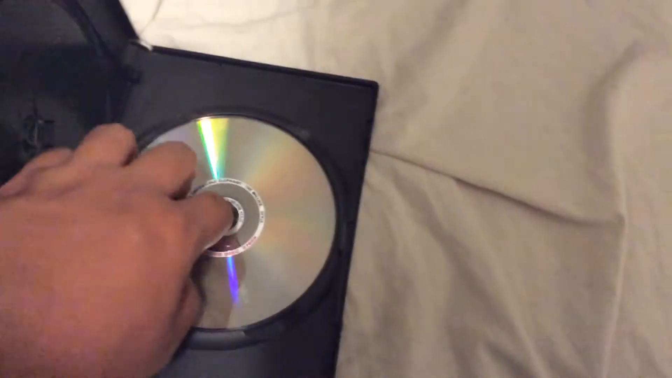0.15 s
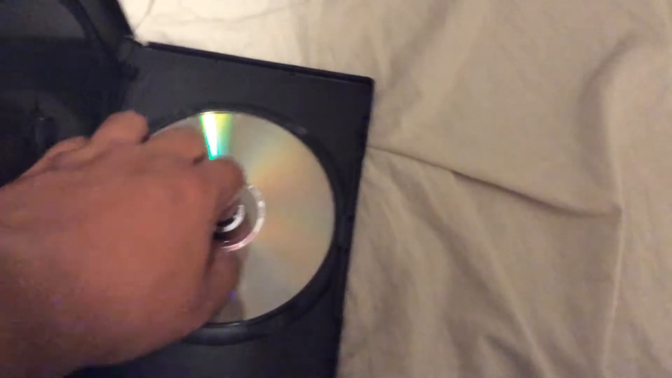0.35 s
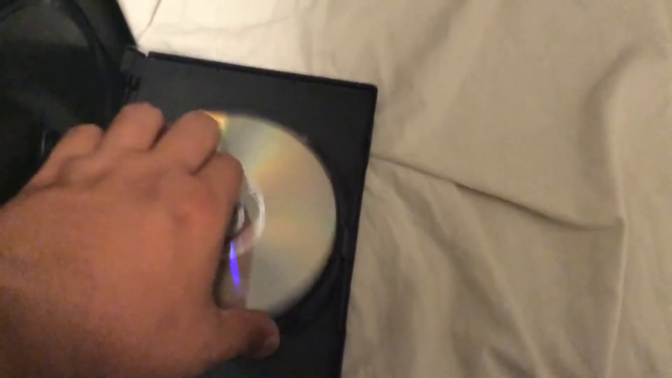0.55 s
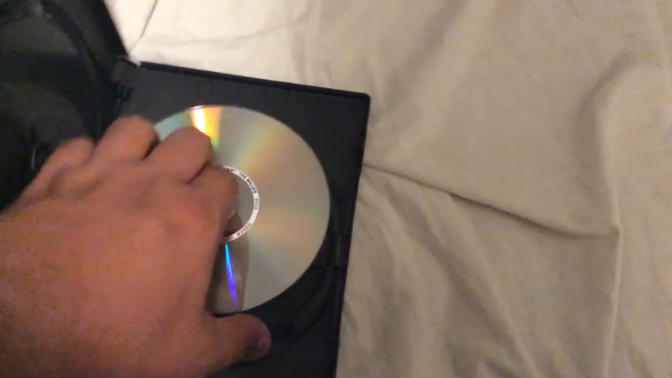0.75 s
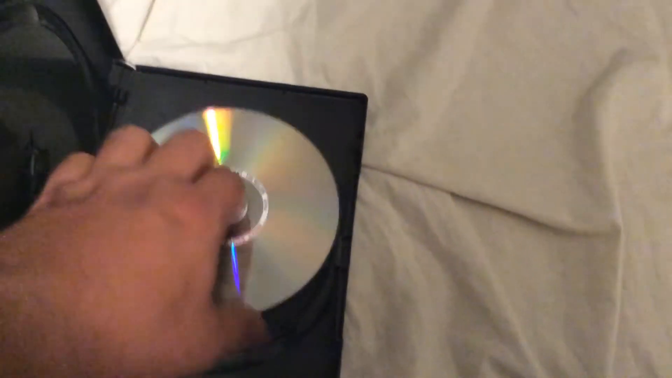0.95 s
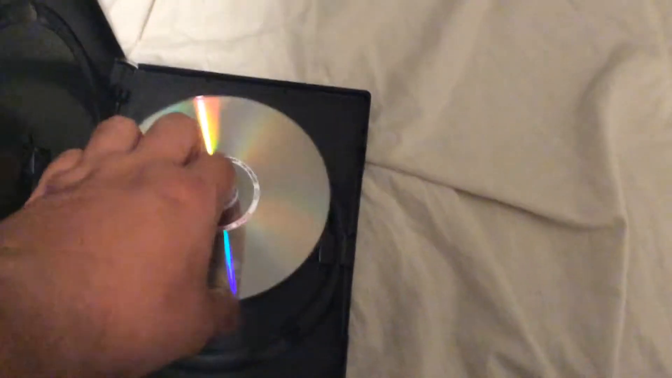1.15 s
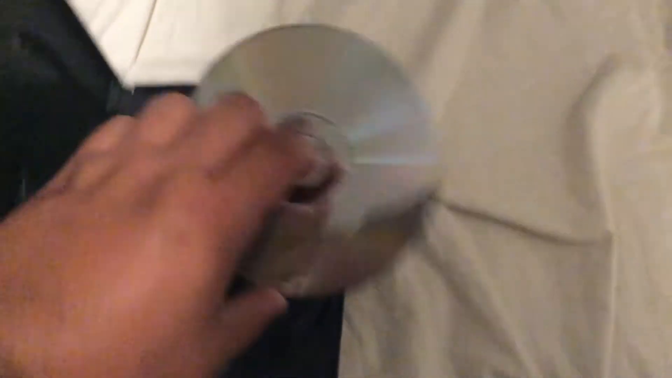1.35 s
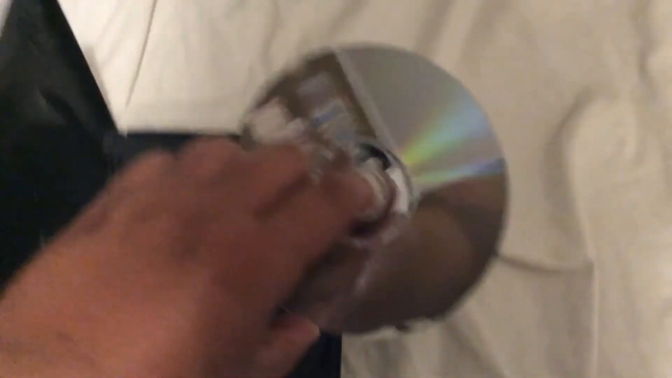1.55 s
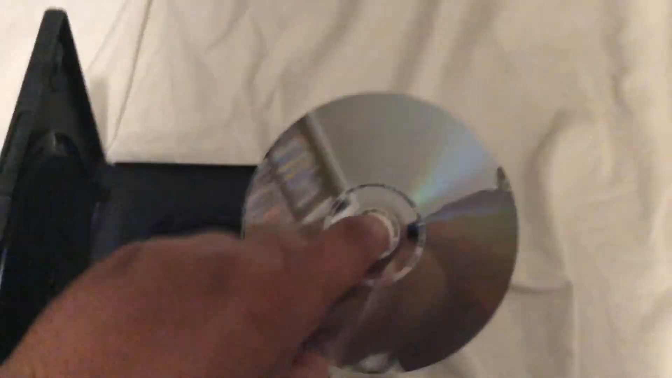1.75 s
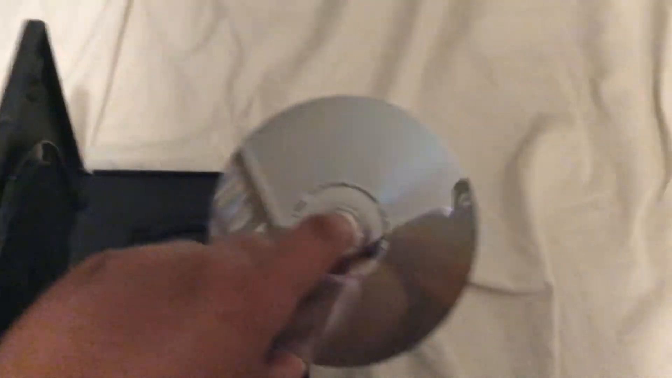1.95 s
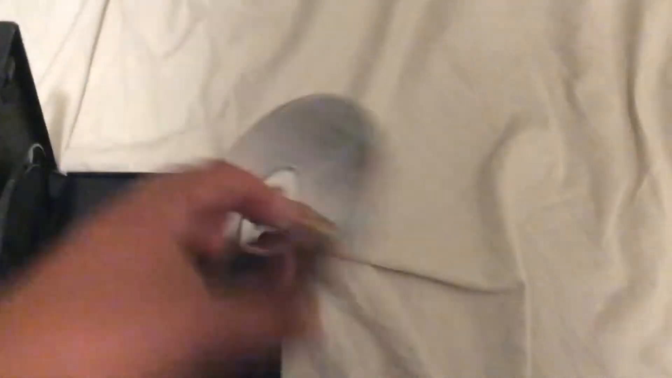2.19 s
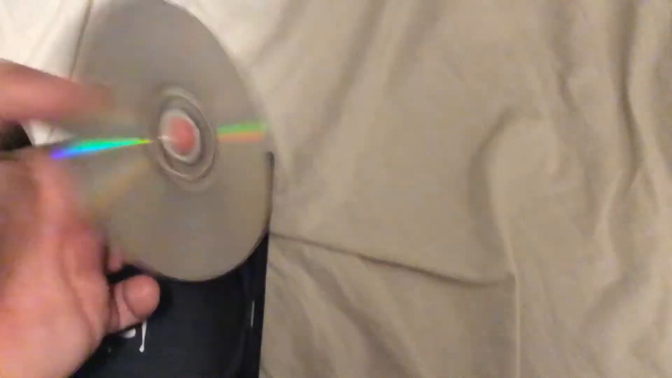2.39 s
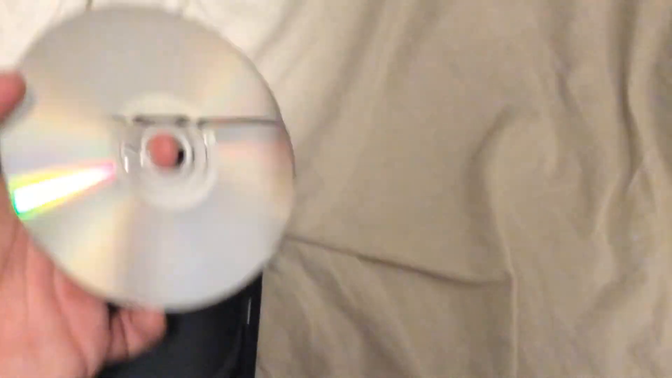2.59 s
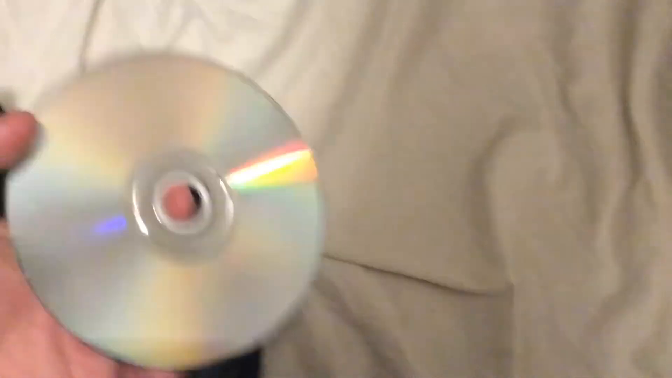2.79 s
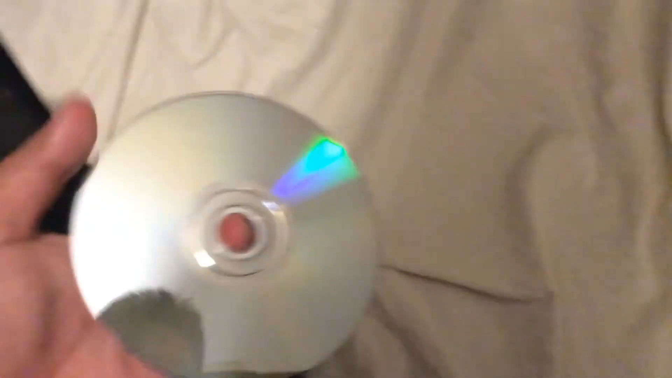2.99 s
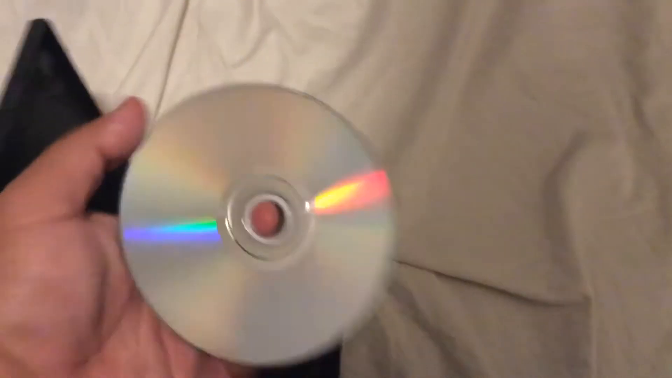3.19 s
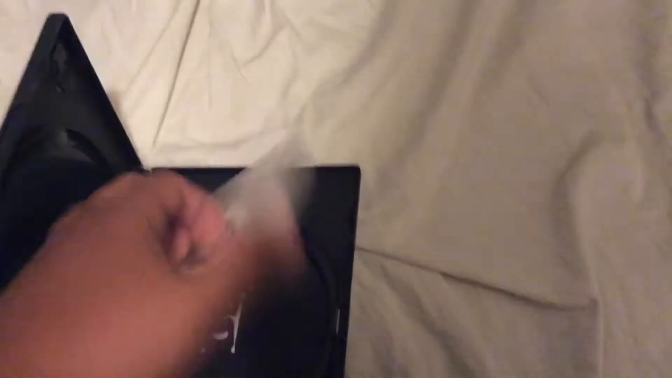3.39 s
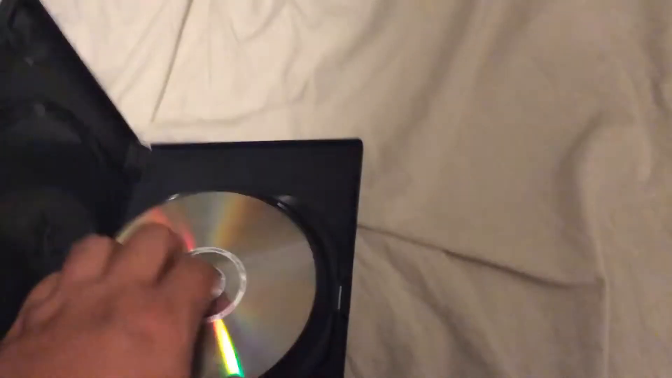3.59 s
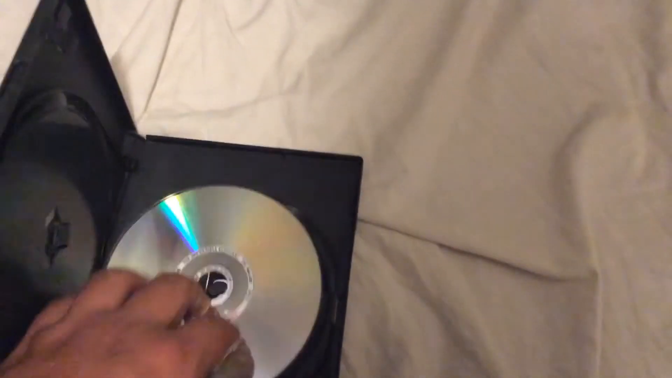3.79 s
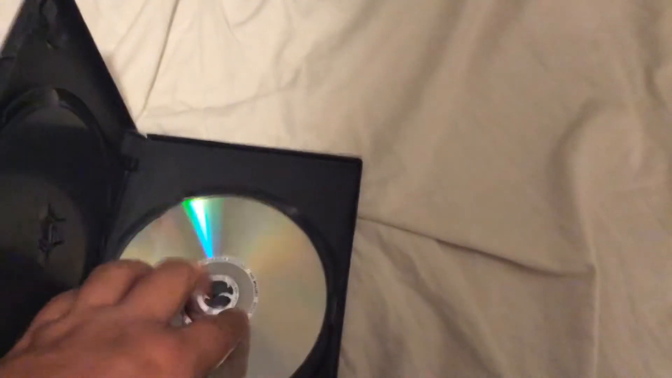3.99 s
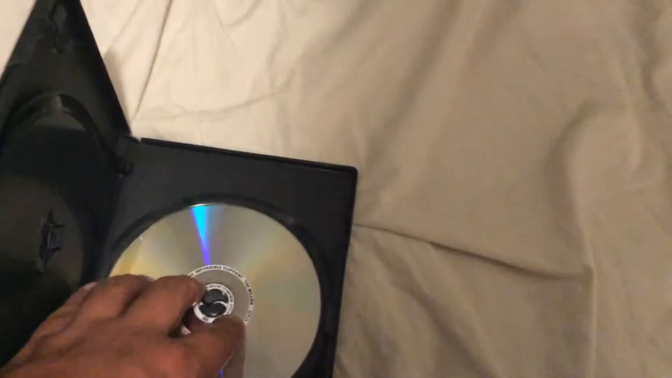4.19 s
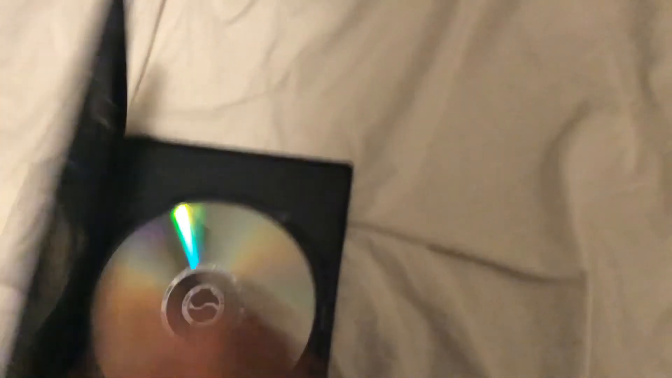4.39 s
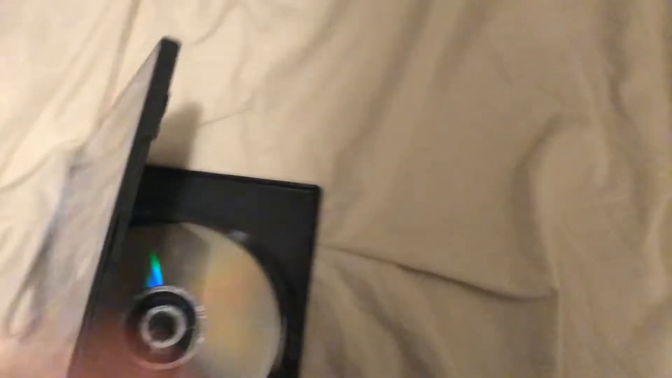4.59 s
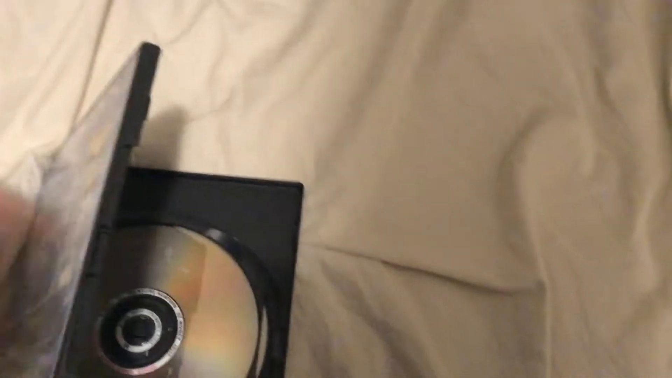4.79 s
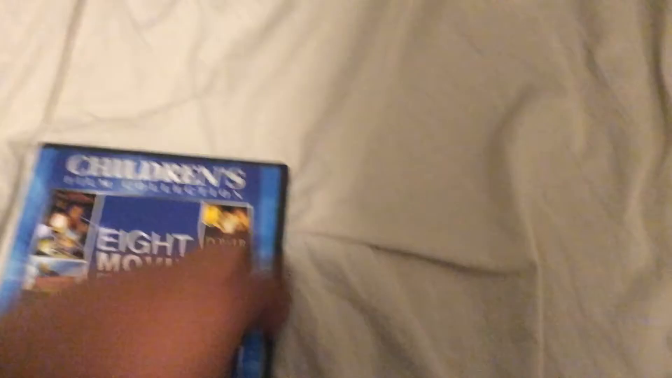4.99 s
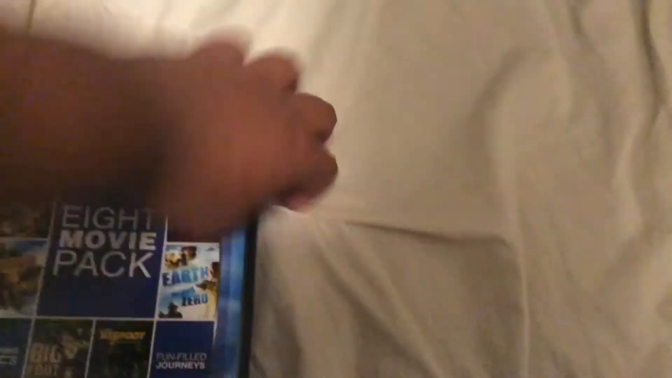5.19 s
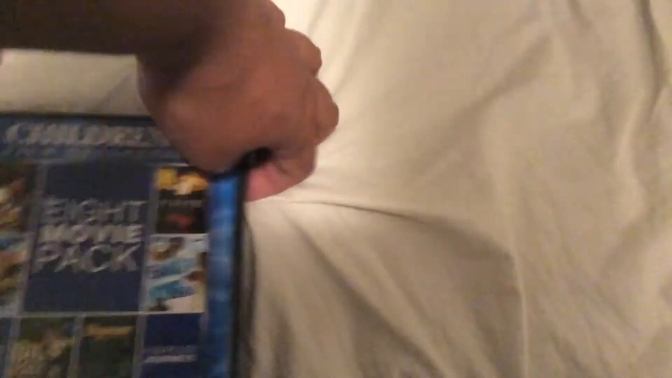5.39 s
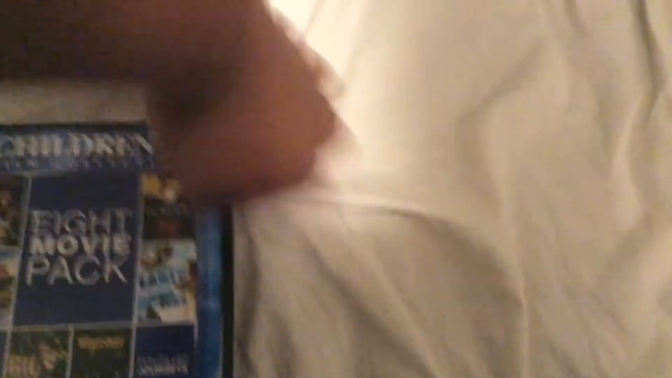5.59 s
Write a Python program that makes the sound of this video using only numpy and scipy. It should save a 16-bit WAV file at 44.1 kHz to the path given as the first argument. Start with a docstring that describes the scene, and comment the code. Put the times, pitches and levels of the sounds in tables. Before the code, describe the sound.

Close-miked handling of a plastic disc case on a bed in a small, slightly live room, with faint low ventilation hum and steady room noise. Soft finger rubbing and two tiny ticks lead to a very loud, short hub snap at 0.4 s. From 0.6 to 0.75 s brittle clicks, small creaks and scrapes rattle the tray; a few more clicks come around 1.0 to 1.15 s. Then it is quiet, with only light fingertip slides at about 2.1 to 2.9 s and barely audible thin, high skin squeaks. At 3.4 s tray knocks and scrapes resume, densest at 3.6 to 3.8 s with sharp clicks and short pitched creaks. Smaller clicks precede a crisp, quickly doubled seating snap at 4.2 s. The spine cracks loudly at 4.66 s with a low thump, a scrape and knock follow at 4.9 s, light taps at 5.0 to 5.15 s, and a firm, lower latch snap at 5.5 s.

```python
"""Plastic disc case handled close up

A disc case is handled on a bed in a small room. Four big snaps: hub release, disc seating, spine, latch.
Each snap is a crack plus a short, dense noise ring, coloured by the modes of the part that gives way.
Light knocks and creaks ring the tray. Scrapes are sparse, uneven tiny slips through it; finger slides
are denser slips in clumps. Squeaks are jittered tone glides, mattress bumps are dying sines.
Behind: room noise and ventilation hum.
"""
import sys
import numpy as np
from scipy import signal
from scipy.fft import rfft, irfft
from scipy.io import wavfile
from scipy.ndimage import uniform_filter1d

SR = 44100
rng = np.random.default_rng(int(sys.argv[2]) if len(sys.argv) > 2 else 0)


def digitize_waveform(pressure):
    """Quantize a signal to 16-bit integers and store it at the path in sys.argv[1].

    Rows of a 2-D input are taken as channels; values are limited to [-1, 1].
    """
    field = np.atleast_2d(pressure).T
    bounded = np.clip(field, -1, 1)
    quanta = np.round(bounded * 32767).astype(np.int16)
    wavfile.write(sys.argv[1], SR, quanta)


N = 249165
SIZE = 8192  # samples in one blow
HZ = np.fft.rfftfreq(SIZE, 1 / SR)

# Blows of each snap: [t/s, energy/dB, ring t60/s, room/dB]
# hub lets go of the disc
RELEASE_BLOWS = [(.3884, 12.5, 0.014, -8.5)]
# disc slips over the hub's teeth
SEAT_BLOWS = [(4.2089, -0.5, 0.023, -6), (4.2116, 8.5, 0.032, -6), (4.2162, 10, 0.004, -2.5)]
# spine cracks as the lid swings
SPINE_BLOWS = [(4.6602, 11.4, 0.039, -0.7)]
# rim is squeezed shut
LATCH_BLOWS = [(5.4914, 1.9, 0.022, 1), (5.4922, 9.7, 0.041, -20)]

# Broad colour of each snap, relative: [f/Hz, density/(dB per Hz)]
RELEASE_SPECTRUM = [(59, -41.5), (100, -26), (244, -9.5), (480, -16.5), (740, -4.5), (1060, -17.5),
                    (1870, -16), (2520, -4), (3050, -15), (3620, -20), (4110, -21), (6700, -23.5),
                    (7140, -19), (14100, -18), (16000, -30.5)]
SEAT_SPECTRUM = [(59, -28), (100, -9), (513, -17), (891, -3), (1100, -18), (1390, -3), (1550, -11),
                 (1870, 1), (4020, -14.5), (4470, -13.5), (6150, -20), (9020, -18.5), (16000, -26.5)]
SPINE_SPECTRUM = [(59, -30), (100, -24), (406, -10.5), (513, -17), (891, -9), (991, -17.5), (1520, -5.5),
                  (1870, -16.5), (2130, -7.5), (3860, -12.5), (7140, -17.5), (9410, -15), (16000, -25.5)]
LATCH_SPECTRUM = [(59, -42), (100, -8.5), (177, -8.5), (330, 0.5), (524, -10), (750, 6), (950, -9.5),
                  (1200, -5), (1910, -10.5), (2200, -5), (3320, -30), (3940, -19), (4470, -18), (6560, -17),
                  (16000, -28.5)]

# Resonances of the snapping part, relative levels: [f/Hz, width before loss floor/Hz, level/dB]
RELEASE_RESONANCES = [(883, 60, 3), (1437, 790, -7), (2470, 33, -1), (3560, 670, -3), (4140, 250, -2.5),
                      (5396, 340, -2.5), (6540, 110, -5), (8000, 58, -14.5), (8750, 33, -5),
                      (10460, 295, -15.5)]
SEAT_RESONANCES = [(740, 130, -1.5), (1350, 100, -18), (2030, 63, 7.5), (2140, 280, 1), (2700, 46, -16),
                   (3100, 86, -10.5), (4460, 24, -14.5), (4860, 75, -16.5), (6460, 47, -11),
                   (8200, 90, -6.5)]
SPINE_RESONANCES = [(825, 54, 8), (1560, 210, -18), (2690, 43, 6.5), (3870, 220, 9), (4300, 180, 8),
                    (5460, 65, -7), (5400, 100, 4.5), (6450, 26, -3.5), (6390, 42, 6.5), (8000, 190, 3.5),
                    (8200, 230, -4.5), (9260, 210, 0.5)]
LATCH_RESONANCES = [(304, 76, -10), (747, 120, -9), (1540, 200, -7), (2140, 130, -8), (3140, 240, -6.5),
                    (3770, 380, -8), (4230, 64, -14), (4990, 57, -9.5), (7850, 90, -26), (8620, 76, -19)]

# Light knocks of disc, tray, lid:
# [t/s, level before colour/dB, weight = low-body lift/dB, hardness = treble slope/(dB/octave), spot f/Hz]
KNOCKS = [(0.071, -5.5, 3, -4.5, 4370), (0.134, 0, -3, -1, 4550), (0.6032, -16.5, 9, -1, 2890),
          (0.6355, -8, 8, 1, 7000), (0.688, 5.5, -4, -.5, 5700), (0.699, 5, -0.5, -3, 4130),
          (0.7036, 1.5, 5.5, -6, 3150), (0.713, -0.5, -3, -5, 4000), (0.9923, -9, 14.5, -5, 3950),
          (1.057, -2, 4.5, -2.5, 4220), (1.0735, -1, -2.5, -4, 4050), (1.134, -16.5, 8.5, -5, 3000),
          (3.4102, -2, -7, -1, 9200), (3.5929, -9.5, -3, 0.5, 2580), (3.624, -8.5, 6.5, 0.5, 7740),
          (3.7517, 8, -11, -4.5, 2760), (3.764, -8.5, 9.5, 0.5, 5700), (3.793, 13, -11, -4, 2200),
          (3.9036, -3, 8, -8, 680), (3.919, -2.5, -2, -2, 3940), (4.0172, -16.5, 0.5, -5.5, 3900),
          (4.0418, -2.5, 8, -5.5, 1980), (4.0526, -11.5, -2, 0, 3370), (4.1347, 5, 4, -2, 4230),
          (4.141, 8.5, -5, -11.5, 1250), (4.4185, -24.5, 21.5, 1.5, 2210), (4.883, -2, 3.5, 0, 8800),
          (4.9976, -10, 2, -2, 6800), (5.0063, -6.5, 10, 0.5, 1450), (5.028, -9, 4.5, -3, 1200),
          (5.1414, -13.5, 9.5, -1.5, 1450)]
# Colour shared by all knocks: [f/Hz, level/dB]
KNOCK_SPECTRUM = [(60, -12), (200, -1), (550, -0.5), (2000, -2.5), (5200, -1), (12000, -6.5)]
# Disc binds on the hub, slips with a short pitched creak: [t/s, level before colour/dB, pitch f/Hz]
HUB_CREAKS = [(0.6454, -8.5, 3880), (0.6645, -8.5, 3150), (1.034, -21, 2020), (3.5985, -7.5, 2330),
              (3.6622, -10, 2500), (3.770, -4.5, 3840), (3.786, -4, 3950), (3.792, -6, 3000),
              (3.814, -10.5, 4000), (4.0483, -9.5, 3870)]
# Colour shared by all creaks: [f/Hz, level/dB]
CREAK_SPECTRUM = [(60, -38), (200, 1.5), (550, 1), (2000, 1.5), (5200, 0.5), (12000, -9)]
# Resonances of the tray with the disc in it, negative = node: [f/Hz, width/Hz, lift/dB]
TRAY_RESONANCES = [(290, 240, 3), (490, 180, -6.5), (645, 300, 6.5), (875, 90, 4.5), (1000, 83, -13.5),
                   (1375, 480, 5), (2125, 360, 8.5), (3016, 570, 5), (3900, 240, 1.5)]

# Disc edge or lid scrapes over the tray: [start t/s, length/s, direct rms/dB, brightest f/Hz]
SCRAPE_STROKES = [(0.586, 0.026, -46.5, 640), (0.6, 0.082, -45.5, 3080), (0.742, .045, -49.5, 2640),
                  (0.96, 0.17, -56, 2430), (1.056, 0.018, -46, 4070), (3.408, 0.062, -50.5, 2870),
                  (3.606, 0.27, -54, 2700), (3.876, 0.086, -51.5, 2500), (3.698, .07, -48, 2300),
                  (4.01, 0.083, -54, 2900), (4.392, 0.051, -58.5, 2200), (4.871, 0.043, -40.5, 3900),
                  (5.005, 0.04, -51, 1500)]
# Fingertips slide over disc and cover: [start t/s, length/s, direct rms/dB, brightest f/Hz]
SLIDE_STROKES = [(0, .62, -69, 9200), (0.962, 0.024, -59, 5500), (1.15, 0.16, -75, 4950),
                 (2.144, 0.019, -59.5, 4740), (2.168, .039, -53, 3960), (2.318, 0.042, -53, 4400),
                 (2.26, 0.3, -66.5, 3400), (2.52, 0.22, -71, 4160), (2.852, 0.044, -64.5, 5060),
                 (3.18, .2, -71.5, 5520), (3.85, 0.76, -71, 9400), (5.046, .25, -66, 4000)]
# Dry skin squeaks on the polished disc: [start t/s, length/s, from f/Hz, to f/Hz, direct rms/dB]
SKIN_SQUEAKS = [(2.005, 0.07, 12500, 14350, -85.5), (2.07, .09, 13600, 14400, -81.5),
                (2.376, 0.14, 14500, 12500, -86)]
# Whole case bumps on the mattress: [t/s, level before rise and high-pass/dB, f/Hz]
MATTRESS_BUMPS = [(.389, -28.5, 186), (3.753, -35, 179), (4.135, -33, 168), (4.212, -30.5, 127),
                  (4.66, -20.5, 109), (4.663, -26.5, 203), (4.872, -26, 264), (4.88, -25, 120),
                  (5.006, -33.5, 139), (5.493, -27, 114)]

# Room decay: [f/Hz, t60/s]
ROOM_T60 = [(150, .26), (500, 0.18), (1500, 0.24), (4000, .27), (9000, 0.26), (15000, 0.2)]
# Room colour: [f/Hz, level/dB]
ROOM_SPECTRUM = [(100, -5), (400, -4.5), (900, -0.5), (2500, -3.5), (8000, -0.5), (15000, -1.5)]
# Steady room noise, relative: [f/Hz, density/(dB per Hz)]
AIR_SPECTRUM = [(25, -18.5), (92, -13), (127, -6.5), (166, -15.5), (242, -15.5), (285, -23), (373, -16.5),
                (427, -21.5), (734, -23), (1290, -28), (2400, -27.5), (3200, -39), (9500, -43),
                (16000, -54.5)]
# Ventilation hum: [f/Hz, width/Hz, rms/dB]
HUM_BANDS = [(80.6, 26, -57.5), (112.75, 28, -58), (393, 84, -68)]

BODY_HZ, KNEE_HZ = 580, 2000  # weight acts fully below the first, hardness above the second
RING_T60_S, RING_DOUBLES_DB = 0.02, 29  # knock ring at zero weight; weight that doubles it
ROOM_DB, ROOM_DB_PER_WEIGHT_DB = -8.5, 0.27  # the more of the tray moves, the more the room answers
THUMP_CYCLES = 8.2  # swings until a bump has died by 60 dB
AIR_RMS_DB, EDGE_HZ = -57, 16100


def snap(blows, spectrum, resonances, modes_db):
    """A catch gives way and rings the part that held it."""
    broad = evened(gain_of(read(spectrum, HZ)))
    loss = 0.035  # soft plastic: no mode is narrower than loss x f
    power = np.zeros(len(HZ))
    for hz, width_hz, db in resonances:
        power += gain_of(db) ** 2 * bell(HZ, hz, max(width_hz, loss * hz)) ** 2
    peaks = evened(np.sqrt(power))
    gain = evened(np.hypot(broad, gain_of(modes_db) * peaks))
    out = np.zeros(N)
    for s, db, ring_t60_s, room_db in blows:
        # shorter ring: more energy in the stop pulse
        spike = 0.011 / ring_t60_s
        sound = blow(gain, ring_t60_s, room_db, crack=0.62, crack_t60_s=0.004,
                     rise_share=0.02, spike=spike)
        add(out, s, gain_of(db) * sound)
    return out


def blow(gain, ring_t60_s, room_db, crack, crack_t60_s, rise_share, spike):
    """A crack, then bending waves criss-cross the thin plate and die; the room answers."""
    t = np.arange(SIZE) / SR
    # long rings start more softly
    swell = 1 - np.exp(-(t / (rise_share * ring_t60_s)) ** 2)
    ring = evened(rng.standard_normal(SIZE) * swell * gain_of(-60 * t / ring_t60_s))
    front = evened(rng.standard_normal(SIZE) * gain_of(-60 * t / crack_t60_s))
    z = rfft(ring + crack * front)
    # drive all frequencies alike; the plate gives the colour
    z /= causal(np.sqrt(uniform_filter1d(abs(z) ** 2, size=90)))
    # the moving part hits its stop with one sharp pulse, 0.6 ms in
    stop = np.exp(-2j * np.pi * HZ * 0.0006)
    z = (z + spike * stop) / np.hypot(1, spike)
    # the room is fed a coloured pulse
    sound = gain_of(room_db) * room(irfft(stop * causal(all_round(gain))))
    add(sound, 0, irfft(z * causal(gain)))
    return sound


def all_round(gain):
    """A plate beams each mode another way, so the room gets a colour with narrow peaks evened out."""
    k = np.arange(len(gain))
    lo = k - k // 18
    hi = np.minimum(k + k // 18 + 1, len(gain))
    power = np.concatenate([[0], np.cumsum(gain ** 2)])
    return np.sqrt(abs(power[hi] - power[lo]) / (hi - lo))


def clicks():
    """Light knocks: a heavier contact shakes more tray and rings longer, a harder one gives more treble."""
    out = np.zeros(N)
    body = read([(BODY_HZ, 1), (KNEE_HZ, 0)], HZ)
    octaves_up = np.log2(np.maximum(HZ / KNEE_HZ, 1))
    for s, db, weight_db, hardness_db_per_octave, spot_hz in KNOCKS:
        colour_db = read(KNOCK_SPECTRUM, HZ) + weight_db * body + hardness_db_per_octave * octaves_up
        ring_t60_s = RING_T60_S * 2 ** (weight_db / RING_DOUBLES_DB)
        room_db = ROOM_DB + ROOM_DB_PER_WEIGHT_DB * weight_db
        add(out, s, knock(db, colour_db, spot_hz, lift_db=10.5, spot_width=0.09,
                          ring_t60_s=ring_t60_s, room_db=room_db))
    return out


def creaks():
    """Each slip of the disc on the hub rings one tooth far above the rest of the tray."""
    out = np.zeros(N)
    for s, db, hz in HUB_CREAKS:
        add(out, s, knock(db, read(CREAK_SPECTRUM, HZ), hz, lift_db=18, spot_width=0.105,
                          ring_t60_s=0.02, room_db=-8))
    return out


def knock(db, colour_db, spot_hz, lift_db, spot_width, ring_t60_s, room_db, top_hz=12500, spike_s=0.011):
    """One light blow on the tray: the touched spot resonates; a short ring has a stronger stop pulse."""
    spot_db = lift_db * bell(HZ, spot_hz, spot_width * spot_hz)
    gain = treble_cut(top_hz) * gain_of(db + colour_db + tray_db(HZ) + spot_db)
    return blow(gain, ring_t60_s, room_db, crack=0.68, crack_t60_s=0.0038,
                rise_share=0.061, spike=spike_s / ring_t60_s)


def tray_db(hz):
    """The tray's resonances as a lift over its mean response."""
    return sum(db * bell(hz, centre_hz, width_hz) for centre_hz, width_hz, db in TRAY_RESONANCES) - 3.5


def treble_cut(top_hz):
    """Steep low-pass at top_hz: knocks, creaks and rubs are dull in the highest treble."""
    return 1 / np.sqrt(1 + (HZ / top_hz) ** 10)


def scrapes():
    """Disc edge or lid on the tray: sparse, uneven slips."""
    return rubs(SCRAPE_STROKES, below_db=3, above_db=7, lift_db=4.5, lift_width=0.05,
                slips_per_s=800, grain_db=7, clump_db=0)


def slides():
    """Fingertips on disc and cover: denser, more even slips, in clumps."""
    return rubs(SLIDE_STROKES, below_db=7.5, above_db=4.5, lift_db=5.5, lift_width=0.057,
                slips_per_s=1300, grain_db=3.5, clump_db=1.5)


def rubs(strokes, below_db, above_db, lift_db, lift_width, slips_per_s, grain_db, clump_db, top_hz=12500):
    """Tiny slips excite the tray; colour falls by below_db, above_db per octave around a resonance."""
    smooth = 0.38  # gain of even hiss between the slips
    out = np.zeros(N)
    for s, length_s, db, hz in strokes:
        count = int(length_s * SR)
        hiss = rng.standard_normal(SR)
        chance = rng.random(SR)
        size = rng.exponential(1, SR)
        grains = np.sign(hiss) * (chance < slips_per_s / SR) * gain_of(grain_db * np.minimum(size, 3))
        slips = smooth * hiss + grains
        # slow random swell of slip strength by clump_db; 0 leaves it steady
        slips *= gain_of(clump_db * evened(uniform_filter1d(rng.standard_normal(SR), size=220)))
        octaves = np.log2((HZ + 1) / hz)
        slope_db = np.minimum(below_db * octaves, -above_db * octaves)
        colour_db = slope_db + lift_db * bell(HZ, hz, lift_width * hz)
        colour = treble_cut(top_hz) * gain_of(colour_db + tray_db(HZ))
        stroke = slips[:count] * signal.windows.tukey(count, 0.7)
        sound = signal.fftconvolve(stroke, irfft(causal(colour)))
        add(out, s, gain_of(db) * sound / np.sqrt(np.sum(sound ** 2) / count))
    return out


def squeaks(jitter=0.03):
    """Fast stick and slip gives a thin whistle: a straight glide with pitch jitter."""
    out = np.zeros(N)
    for s, length_s, from_hz, to_hz, db in SKIN_SQUEAKS:
        count = int(length_s * SR)
        hz = np.linspace(from_hz, to_hz, count) * (1 + jitter * rng.standard_normal(SR)[:count])
        tone = np.sin(2 * np.pi * np.cumsum(hz) / SR)
        add(out, s, gain_of(db) * evened(tone * np.hanning(count)))
    return out


def thumps(rise_s=0.00088, cut_hz=70):
    """The case rocks a few cycles, damped by the bedding; it is too small to radiate deep bass."""
    out = np.zeros(N)
    t = np.arange(SIZE) / SR
    for s, db, hz in MATTRESS_BUMPS:
        envelope = gain_of(db - 60 * t * hz / THUMP_CYCLES) * (1 - np.exp(-t / rise_s))
        add(out, s, envelope * np.sin(2 * np.pi * hz * t))
    return signal.sosfilt(signal.butter(2, cut_hz, "high", fs=SR, output="sos"), out)


def room(x, first_s=0.004, build_s=0.004):
    """Close walls: reflections build fast, each band dies at its own speed; each call draws new paths."""
    count = 2 * SIZE
    t, hz = np.arange(count) / SR, np.fft.rfftfreq(count, 1 / SR)
    sparse = rng.standard_normal(count) * (rng.random(count) < 9000 / SR)  # 9000 reflections/s
    taps = sparse * np.clip((t - first_s) / build_s, 0, 1)
    bands_hz, at_s, z = signal.stft(taps, SR, nperseg=256)
    decay = gain_of(-60 * at_s / read(ROOM_T60, bands_hz)[:, None])
    tail = signal.istft(z * decay, SR, nperseg=256)[1]
    z = rfft(tail, count)
    # flatten the tail, then colour it
    z *= causal(gain_of(read(ROOM_SPECTRUM, hz)) / np.sqrt(uniform_filter1d(abs(z) ** 2, size=110)))
    return signal.fftconvolve(x, irfft(z))


def air():
    """Steady shaped noise plus a low, wavering ventilation hum of narrow noise bands."""
    hz = np.fft.rfftfreq(N, 1 / SR)
    hiss = irfft(rfft(rng.standard_normal(N)) * gain_of(read(AIR_SPECTRUM, hz)), N)
    out = gain_of(AIR_RMS_DB) * evened(hiss)
    for centre_hz, width_hz, db in HUM_BANDS:
        hum = irfft(rfft(rng.standard_normal(N)) * bell(hz, centre_hz, width_hz), N)
        out += gain_of(db) * evened(hum)
    return out


def gain_of(db):
    """Decibels to a factor."""
    return 10 ** (np.asarray(db) / 20)


def evened(x):
    """Scaled to rms 1."""
    return x / np.sqrt(np.mean(x ** 2) + 1e-20)


def read(points, hz):
    """A table of (f/Hz, value) interpolated on a log-frequency axis."""
    f, value = np.transpose(points)
    return np.interp(np.log(hz + 1), np.log(f + 1), value)


def add(mix, s, sound):
    """Mixes a sound in at time s, cut at the end of the mix."""
    part = mix[max(round(s * SR), 0):][:len(sound)]
    part += sound[:len(part)]


def bell(hz, centre_hz, width_hz):
    """Resonance curve, 1 at its centre, 1/2 at half the width to either side."""
    return 1 / (1 + (2 * (hz - centre_hz) / width_hz) ** 2)


def causal(gain):
    """Minimum-phase spectrum with this gain: rings only after the blow."""
    log_gain = np.log(np.maximum(gain, 1e-5))
    circle = np.concatenate([log_gain, log_gain[-2:0:-1]])
    return np.exp(np.conj(signal.hilbert(circle)))[:len(gain)]


def scene():
    """All the handling, direct and through the room, over the room noise."""
    release = snap(RELEASE_BLOWS, RELEASE_SPECTRUM, RELEASE_RESONANCES, modes_db=1.5)
    seat = snap(SEAT_BLOWS, SEAT_SPECTRUM, SEAT_RESONANCES, modes_db=-6.5)
    spine = snap(SPINE_BLOWS, SPINE_SPECTRUM, SPINE_RESONANCES, modes_db=-4.5)
    latch = snap(LATCH_BLOWS, LATCH_SPECTRUM, LATCH_RESONANCES, modes_db=-7.5)
    hard = release + seat + spine + latch + clicks() + creaks()  # room already included
    soft = scrapes() + slides() + squeaks() + thumps()
    soft_room = gain_of(-5) * room(soft)[:N]
    return (hard + soft + soft_room + air())[None]


def record(dry):
    """Hard clip at full scale, then a linear-phase low-pass."""
    held = np.clip(dry, -1, 1)
    low_pass = signal.firwin(255, EDGE_HZ, window=("kaiser", 8), fs=SR)
    return signal.oaconvolve(held, low_pass[None], "same")


dry = scene()
out = record(dry)
digitize_waveform(out)
```